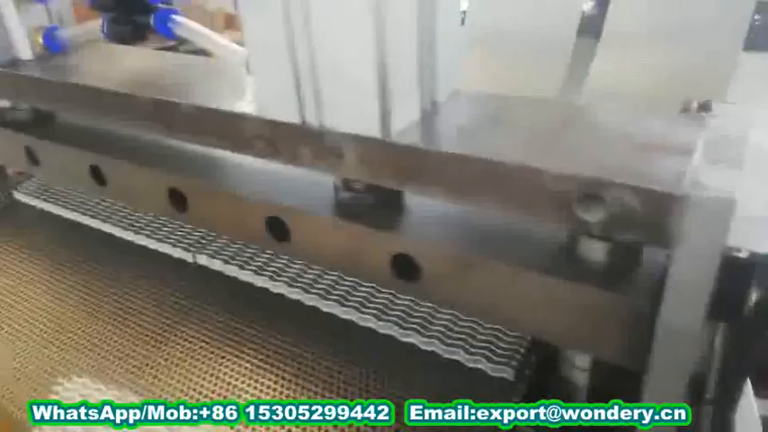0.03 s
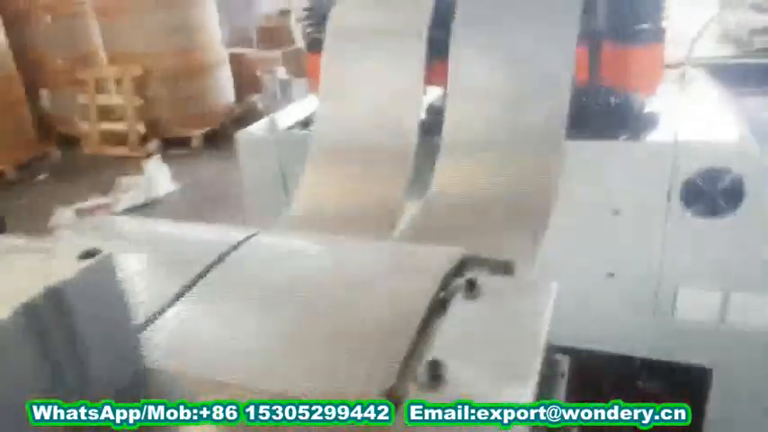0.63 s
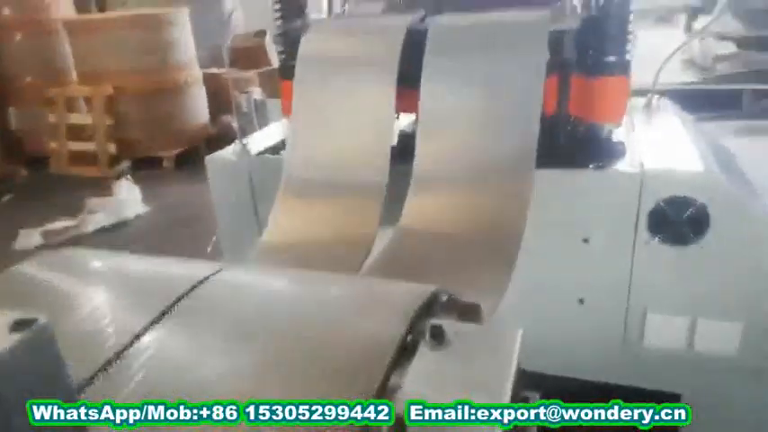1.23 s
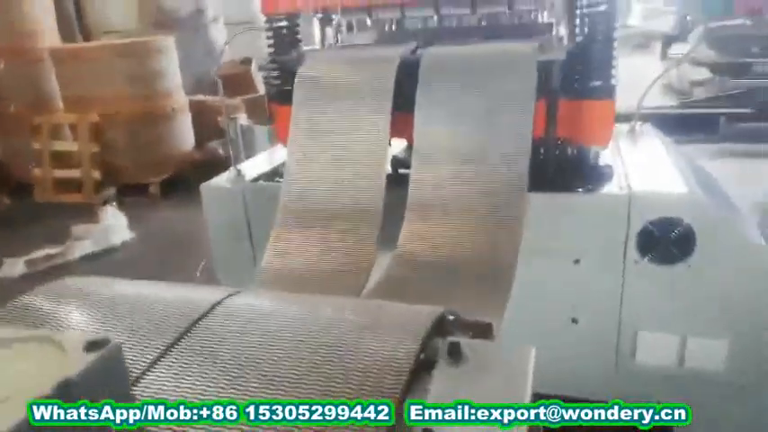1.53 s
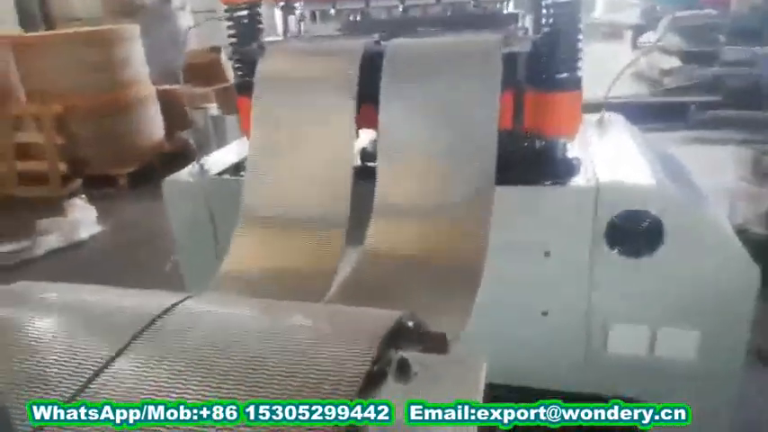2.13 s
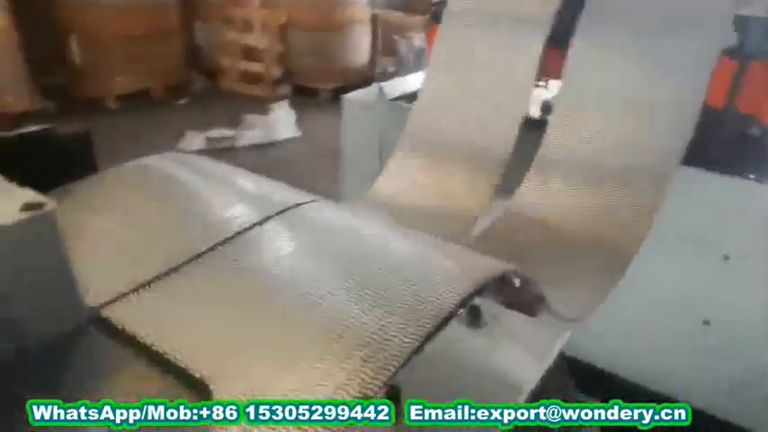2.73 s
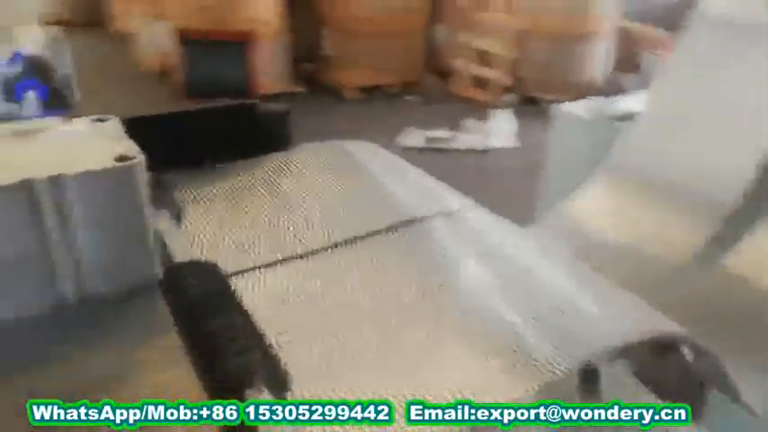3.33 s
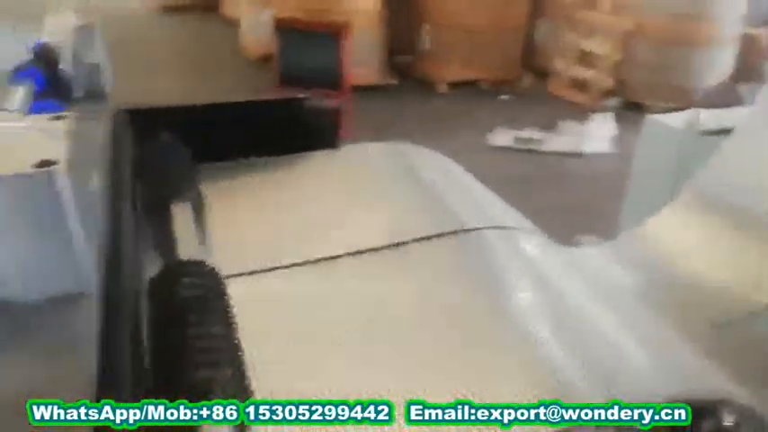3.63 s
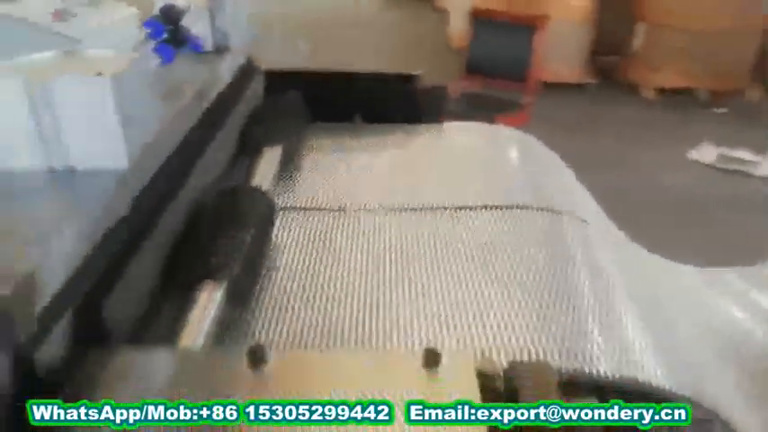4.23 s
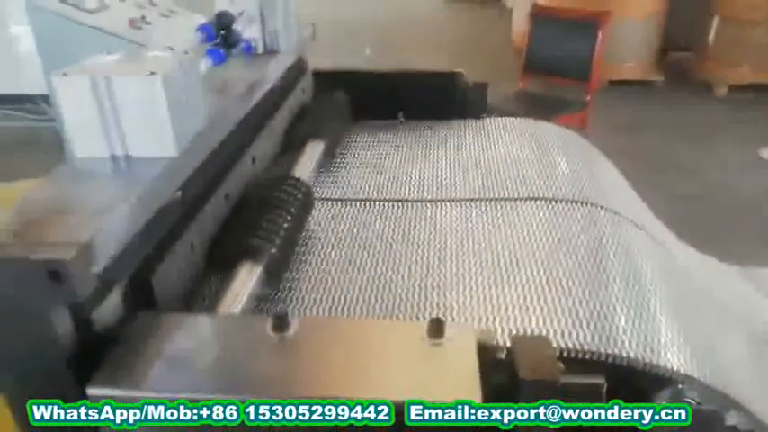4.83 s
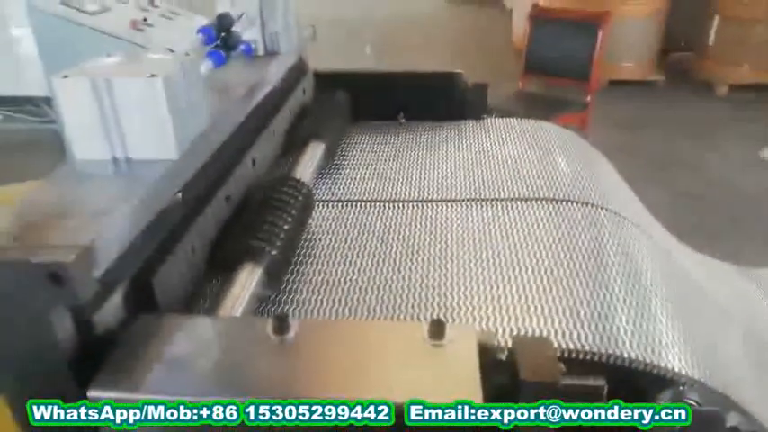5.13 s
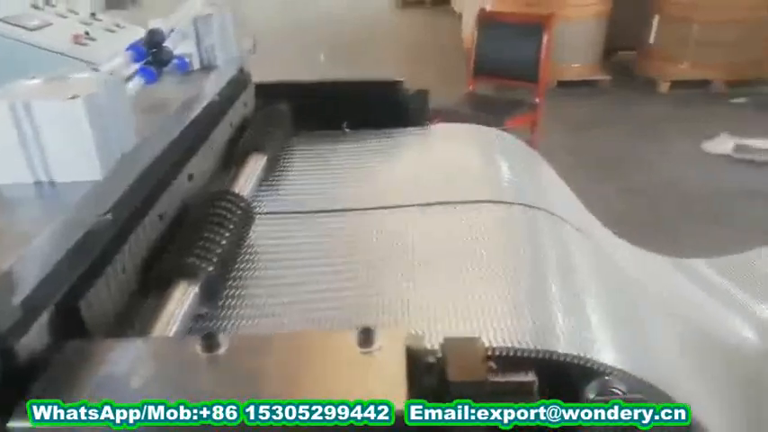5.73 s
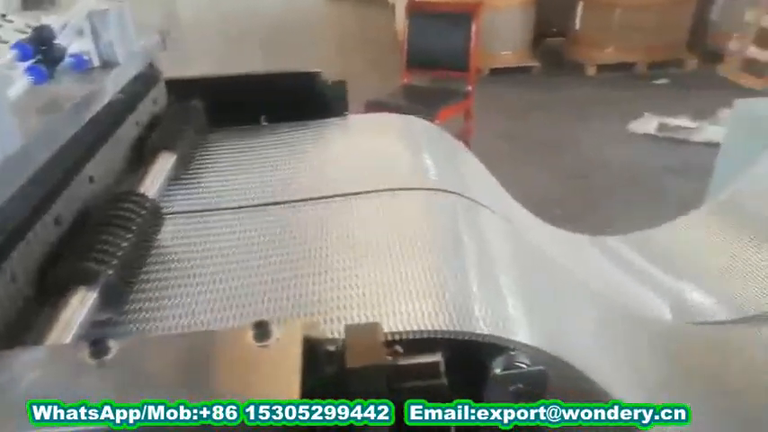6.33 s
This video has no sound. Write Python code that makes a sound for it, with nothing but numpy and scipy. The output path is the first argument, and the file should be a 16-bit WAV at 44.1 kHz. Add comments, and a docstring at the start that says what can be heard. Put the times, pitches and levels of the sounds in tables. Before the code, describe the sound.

A stamping press runs in a large workshop, repeating a down-and-back pattern of heavy thuds, steel clanks, latch knocks and short air puffs. For the first two seconds, thin aluminum strip crinkles and snaps close by. Then the handheld phone microphone nears the feed: the press grows louder and brighter, the drive groans briefly on each cycle, and occasional sharp cracks and small pings cut through. Motors rumble underneath.

```python
"""A fin press stamps aluminium strip in a large workshop, heard on a phone carried from strip to feed.
Every turn plays the same groove, down and back: the latch knocks, blows thud in the heavy body and
clank in the steel tooling, an air valve puffs, and the feed drive groans as it slows.
At first the thin strip crinkles and snaps close by; loose parts ping, and later the die cracks sharply.
Motors rumble underneath and the hall smears it all."""
import sys
import numpy as np
from scipy import signal
from scipy.fft import rfft, irfft, next_fast_len
from scipy.io import wavfile
from scipy.ndimage import uniform_filter1d

SR = 44100
rng = np.random.default_rng(int(sys.argv[2]) if len(sys.argv) > 2 else 0)


def file_out(sig):
    """Save sig as 16-bit WAV at sys.argv[1]."""
    # one column per channel
    cols = np.atleast_2d(sig).T
    # limit, then scale
    lim = np.clip(cols, -1, 1)
    pcm = np.round(lim * 32767).astype(np.int16)
    wavfile.write(sys.argv[1], SR, pcm)


N = 281799
TIME = np.arange(N) / SR
RING = 6144  # samples in one hit
TURN_S, FIRST_TURN_S = .6125, .1023
TURNS = FIRST_TURN_S + TURN_S * np.arange(-1, N / SR / TURN_S)  # start of each turn
TOP_HZ = 11400
# fader rides: (level/dB beside the strip, level/dB beside the feed)
DOWN_DB, BACK_DB = (-2, -0.5), (-4, 1)
TREBLE_DB, DRIVE_DB, WORKSHOP_DB = (-4.5, 2), (-13.5, 3.5), (-6.5, 1)

# how near the phone is to the feed: (t/s, nearness 0-1)
NEARNESS = [(0, 0.88), (.5, 0.6), (1.15, 0.2), (1.75, 0.16), (2.399, 0.91), (3.3, 1), (6.39, 0.91)]
# tone curves of the sources: (f/Hz, level/dB)
WORKSHOP_EQ = [(15, -61), (25, -14.5), (85, 0.5), (151, 4.5), (410, 1), (587, -9), (1030, -6.5),
               (2010, -10.5), (2340, -13.5), (3110, -16), (4020, -17), (4810, -15.5), (6540, -20),
               (10100, -19.5), (11500, -65), (15000, -68), (22000, -120)]
STEEL_EQ = [(200, -35), (500, 3), (800, 3.5), (1300, 2.5), (1700, 2.5), (2400, -4.5), (3100, -3.5),
            (4000, -8), (8000, -48)]
CLICK_EQ = [(800, -12), (2000, 14.5), (3300, 5), (4500, 7), (6500, 3), (8500, 0.5), (10300, 9),
            (11500, -28)]
AIR_EQ = [(800, -51), (2500, 4.5), (4500, 2), (7000, 3.5), (9000, 6), (10300, 7.5), (11500, -18.5)]
STRIP_EQ = [(590, -31), (1000, -6), (1310, 4), (2000, -4), (2560, 1), (3420, -1.5), (3910, 0), (4700, -1),
            (6200, -3.5), (7100, -3.5), (8200, -3), (9400, -3.5), (10300, 0.5), (10900, 1), (11800, -22.5)]
# resonances of the parts: (f/Hz, width/Hz, level/dB)
LATCH_MODES = [(903, 150, 4), (1006, 95, 4.5), (1186, 89, 5.5), (1330, 110, -1), (1527, 70, -1.5),
               (1950, 260, 2)]
LATCH_PING_MODES = [(1950, 170, 8), (2700, 100, 11), (2980, 63, 11), (3140, 84, 7)]
FRAME_MODES = [(122.8, 12, -8), (178, 36, -2.5), (217, 27, 0), (273, 63, 1), (318, 27, 2), (412, 55, 0),
               (518, 46, 3)]
TOOLING_MODES = [(764, 31, 5), (910, 74, -1.5), (1119, 59, 5.5), (1310, 57, 3), (1468, 30, 3),
                 (1960, 90, -18), (2500, 35, 2.5), (3430, 30, 11.5), (4440, 45, 2.5)]
FEED_TABLE_MODES = [(159, 15, -4), (224, 21, 0), (270, 23, 2.5), (360, 40, 0), (409.6, 24, 7),
                    (518, 62, 0.5)]
HOUSING_MODES = [(119.3, 23, 4.5), (158, 28, -1), (413, 41, -2.5)]
STRIP_MODES = [(6190, 140, 10), (8250, 130, 8.5), (8540, 120, 4), (10080, 58, -4), (10360, 110, 1)]
DIE_MODES = [(3420, 90, 10), (4400, 100, -1), (5470, 350, 3), (6800, 270, 0.5), (8250, 350, 1),
             (10260, 430, 4)]
# latch landings, every half turn: (t/s, knock level/dB, knock f/Hz, ping level/dB, tick level/dB)
LATCH_HITS = [(0.1032, -16, 1250, -52, -31), (0.4076, -11, 1210, -26, -20.5), (.7165, -14, 1260, -44, -30),
              (1.0202, -13.5, 1130, -30, -28), (1.33, -23.5, 1250, -49, -33),
              (1.6342, -15.5, 1250, -42, -36), (1.9335, -19.5, 1100, -32, -30),
              (2.246, -14, 1100, -45, -21.5), (2.553, -14, 1300, -40, -25), (2.859, -14.5, 1150, -32, -20),
              (3.167, -16, 1350, -30, -20), (3.4713, -19, 1040, -19, -24.5), (3.7785, -16, 1250, -29, -24),
              (4.0845, -16.5, 1010, -23, -21.5), (4.3906, -16, 1250, -28, -23),
              (4.697, -14.5, 1050, -19, -21), (5.0035, -18, 1290, -40, -22),
              (5.3097, -13.5, 1000, -20, -25), (5.616, -18.5, 1280, -36, -23),
              (5.922, -12.5, 1000, -21, -21.5), (6.2286, -19, 1320, -26, -24)]
# blows of the working and the return stroke:
# (t/s into the turn, thud level/dB, clank level/dB, clank f/Hz, click level/dB, click f/Hz, click t60/s)
DOWN_BLOWS = [(.063, -10, -12.5, 910, -21, 6700, 0.03), (.078, -14.5, -13.5, 1110, -23, 3000, 0.035),
              (.093, -10, -13, 1000, -23.5, 3230, 0.021), (.108, -5.5, -14, 720, -20, 7000, 0.032),
              (.116, -9, -14, 1090, -22.5, 6000, 0.028), (.139, -16, -20.5, 1030, -25.5, 3500, 0.11),
              (.161, -20, -15, 1080, -24, 3500, 0.04), (.168, -13.5, -15.5, 1120, -22, 3000, 0.04)]
BACK_BLOWS = [(.378, -19, -26.5, 700, -28.5, 9000, 0.062), (.394, -17.5, -21.5, 800, -26, 2500, 0.036),
              (.405, -7.5, -16, 650, -34, 2700, 0.019), (.419, -11, -18.5, 700, -40, 2980, 0.033),
              (.441, -13.5, -22, 704, -43, 3000, 0.034), (.462, -18, -17, 900, -22.5, 7560, 0.02),
              (.469, -18, -14, 860, -23, 2200, 0.02)]
# how hard each turn strikes, in order: (working stroke level/dB, return stroke level/dB)
ACCENTS = [(0, 5), (-2, -8.5), (0, -0.5), (-1, 2.5), (-1, 0.5), (-1, 1.5), (0.5, 1), (-0.5, 2), (0.5, 2),
           (-0.5, 1), (0.5, 2), (-1, 6)]
# air valve puffs: (t/s into the turn, attack/s, length/s, level/dB, change over the puff/dB)
PUFFS = [(0.069, 0.0052, 0.12, -27.5, -4.5), (0.373, 0.0098, 0.122, -33.5, 3.5)]
# feed drive groans: (t/s into the turn, length/s, starting f/Hz, fall/(octaves/s), level/dB)
GROANS = [(.385, 0.087, 440.1, 1.0, -18.5), (.49, 0.164, 151.8, 2.58, -33.5)]
# flexes of the strip: (t/s when fully bent, rise/s, hold/s, level/dB, decay/(dB/s))
FLEXES = [(0.496, 0.041, 0.01, -16, 140), (0.616, 0.024, 0.026, -26, 217), (0.758, 0.026, 0.034, -27, 108),
          (1.043, 0.081, 0.051, -19, 228), (1.163, 0.016, 0.014, -16.5, 150),
          (1.44, 0.73, 0.042, -30, 99.5), (1.521, 0.1, 0.026, -17, 180), (1.772, 0.027, 0.036, -18.5, 242),
          (1.913, 0.016, 0.034, -18.5, 164)]
# one-shots from the strip, loose steel parts and the die: (t/s, level/dB, f/Hz)
STRIP_SNAPS = [(0.4978, 0.5, 6100), (0.6096, 0, 8000), (0.665, -9.5, 5000), (0.7593, -4, 8040),
               (.794, -8, 3500), (1.022, -11, 7000), (1.035, -6, 9000), (1.054, -3, 8160),
               (1.073, -4, 9000), (1.09, -3, 9000), (1.161, 2, 7500), (1.179, 1, 7500), (1.5271, -2, 9000),
               (1.556, -12, 9000), (1.582, -6, 7530), (1.764, -2, 7000), (1.784, -1, 8000),
               (1.802, -4, 7450), (1.909, -7, 6940), (1.947, -2, 7000), (1.962, -4, 7950)]
LOOSE_PINGS = [(.797, -18, 3480), (1.41, -22, 3450), (2.655, -22, 4400), (3.283, -22, 3400),
               (3.312, -22, 4300), (3.872, -18, 3450)]
DIE_CRACKS = [(2.618, -18, 7530), (2.655, -13, 4400), (2.745, -12, 6500), (3.23, -16, 6950),
              (3.358, -11.5, 6400), (3.842, -14, 8470), (3.873, -13, 7500), (4.459, -16, 8040),
              (5.067, -13.5, 8340), (6.291, -11, 7420)]
# stereo width at the two microphone ports: (f/Hz, side minus mid level/dB)
WIDTH = [(60, -19), (130, -24.5), (190, -15), (350, -5.5), (620, 2.5), (1120, -5), (2020, 0), (11000, 0)]
# where press and strip sit in the image: (f/Hz, left minus right level/dB)
PRESS_PAN = [(350, 0.5), (620, -5), (1120, -2), (2020, 1.5), (3620, -0.5), (6500, -5), (11000, -2)]
STRIP_PAN = [(620, 17), (1120, 0.5), (2020, -8), (3620, -6), (6500, -3.5), (11700, 5.5)]


def undb(db):
    """Decibels to gain."""
    return np.exp(np.asarray(db) * (np.log(10) / 20))


def unit(x):
    """Scale every row to rms 1."""
    return x / np.sqrt(np.mean(x ** 2, axis=-1, keepdims=True))


def freqs():
    """Frequency grid of the filter curves."""
    return np.maximum(np.fft.rfftfreq(RING, 1 / SR), 1)


def colour(points):
    """EQ curve through (f/Hz, level/dB) points."""
    hz, db = np.transpose(points)
    return undb(np.interp(np.log(freqs()), np.log(hz), db))


def resonances(modes):
    """EQ curve of (f/Hz, width/Hz, level/dB) modes."""
    f = freqs()
    powers = (undb(db) ** 2 / (1 + ((f * f - hz * hz) / (f * width)) ** 2) for hz, width, db in modes)
    return np.sqrt(sum(powers))


def band(hz, relative_width):
    """One broad peak that focuses a hit."""
    return resonances([(hz, relative_width * hz, 0)])


def plate(depth_db, spacing_hz):
    """The crowded weak modes of a metal plate, as random peaks and dips."""
    heights = np.interp(freqs() / spacing_hz, np.arange(RING), rng.standard_normal(RING))
    return undb(depth_db * np.clip(heights, -2, 1))


def shape(x, gain):
    """Apply an EQ curve at minimum phase, so nothing rings ahead of the attack."""
    cepstrum = irfft(np.log(gain + 1e-9))[:RING // 2]
    cepstrum[1:] *= 2
    response = irfft(np.exp(rfft(cepstrum, RING)))[:RING // 2]
    size = next_fast_len(x.shape[-1] + RING // 2, True)
    return irfft(rfft(x, size) * rfft(response, size), size)[..., :x.shape[-1]]


def wander(rate_hz):
    """Random modulator: sample and hold, slewed twice."""
    hold = int(SR / rate_hz)
    steps = np.repeat(rng.standard_normal(N // hold + 1), hold)[:N]
    return unit(uniform_filter1d(uniform_filter1d(steps, hold), hold))


def spikes(per_s, weakest, decay_s):
    """Envelope of random triggers, each dying away."""
    triggers = (rng.random(N) < per_s / SR) * rng.uniform(weakest, 1, N)
    return signal.lfilter([1], [1, -np.exp(-1 / (decay_s * SR))], triggers)


def fading(t60, rise_s):
    """Attack and decay of a struck part."""
    t = np.arange(RING) / SR
    return (1 - np.exp(-t / rise_s)) * undb(-60 * t / t60)


def struck(gain, t60, rise_s):
    """One contact: a noise burst rings through a part's resonances."""
    envelope = fading(t60, rise_s)
    burst = envelope * rng.standard_normal((2, RING))
    return unit(shape(burst, gain)) * np.sqrt(np.mean(envelope ** 2))


def add(out, s, sound):
    """Mix a sound in at s seconds."""
    start = int(s * SR)
    first, end = max(start, 0), min(start + sound.shape[-1], N)
    if end > first:
        out[:, first:end] += sound[:, first - start:end - start]


def near(levels_db):
    """Fader ride for one layer as the phone moves between strip and feed."""
    s, nearness = np.transpose(NEARNESS)
    strip_db, feed_db = levels_db
    return undb(strip_db + (feed_db - strip_db) * np.interp(TIME, s, nearness))


def workshop(bed_db=-30.5, rattle_db=-41):
    """The bed: motors rumble, the workshop hisses, and loose parts rattle faintly."""
    noise = unit(shape(rng.standard_normal((2, N)), colour(WORKSHOP_EQ)))
    bed = noise * undb(bed_db + 1.75 * wander(9.8))
    taps = spikes(per_s=35, weakest=0.13, decay_s=0.016) * rng.standard_normal((2, N))
    rattle = unit(shape(taps, colour(STEEL_EQ) * np.hypot(1, resonances(TOOLING_MODES))))
    return (bed + rattle * undb(rattle_db)) * near(WORKSHOP_DB)


def latch():
    """The steel feed latch lands with a knock, a bright tick and more or less of a ping."""
    out = np.zeros((2, N))
    body, ping = resonances(LATCH_MODES) * colour(STEEL_EQ), resonances(LATCH_PING_MODES)
    for s, knock_db, hz, ping_db, tick_db in LATCH_HITS:
        add(out, s, undb(knock_db) * struck(body * band(hz, 0.64), t60=0.064, rise_s=.0011))
        add(out, s, undb(ping_db) * struck(ping, t60=0.086, rise_s=0.001))
        add(out, s, undb(tick_db) * struck(colour(AIR_EQ), t60=0.053, rise_s=0.0024))
    return out


def add_blow(out, s, db, gain, envelope, fresh, direct=0, jitter_s=.001, uneven_db=.9):
    """One contact on every turn: a direct push, then scatter, part repeating and part fresh."""
    noise = rng.standard_normal((len(TURNS) + 1, 2, RING))
    push = unit((noise[0] + fresh * noise[1:]) * envelope)
    push[:, 0, 0] += direct * np.sqrt(RING)  # an impulse in the mid channel
    rings = unit(shape(push, gain)) * np.sqrt(np.mean(envelope ** 2))
    for start, ring in zip(TURNS, rings):
        onset = start + s + jitter_s * rng.standard_normal()
        add(out, onset, undb(db + uneven_db * rng.standard_normal()) * ring)


def stroke(blows, body_modes, presence):
    """Each blow thuds in a heavy body, clanks in the tooling and clicks at the contact."""
    thud, clank, click = np.zeros((3, 2, N))
    body = resonances(body_modes) * resonances([(335, 340, 0)])
    tooling = np.hypot(1, resonances(TOOLING_MODES))
    for s, thud_db, clank_db, clank_hz, click_db, click_hz, t60 in blows:
        steel = tooling * plate(depth_db=7.5, spacing_hz=59.78) * colour(STEEL_EQ) * band(clank_hz, 0.53)
        edge = tooling * plate(depth_db=9, spacing_hz=120) * colour(CLICK_EQ) * band(click_hz, 0.73)
        add_blow(thud, s, thud_db, body, fading(1.414 * t60, rise_s=0.0018), fresh=0.63, direct=0.65)
        add_blow(clank, s, clank_db, steel, fading(1.47 * t60, rise_s=0.0013), fresh=0.91, direct=0.43)
        add_blow(click, s, click_db, edge, fading(t60, rise_s=0.0008), fresh=2)
    boom = hall(thud, wet_db=-12.5, t60=0.43)
    # the clanks carry far, the thuds are loud only nearby
    return boom * presence + clank * presence ** .2 + click * near(TREBLE_DB)


def air_valve(closing_s=0.012, flutter_db=2.2):
    """A valve puffs twice a turn: the first jet sags as the pressure drops, the second swells."""
    turn_time, flow = (TIME - FIRST_TURN_S) % TURN_S, 0
    for s, opening_s, length, db, change_db in PUFFS:
        age = turn_time - s
        gate = np.clip(age / opening_s, 0, 1) * np.clip((length - age) / closing_s, 0, 1)
        flow = flow + gate * undb(db + change_db * np.clip(age / length, 0, 1))
    jet = unit(shape(rng.standard_normal((2, N)), colour(AIR_EQ) * plate(depth_db=2.5, spacing_hz=110)))
    return flow * undb(flutter_db * wander(110)) * jet * near(TREBLE_DB)


def rebounds(first_s=.194, gap_s=.040, fade_db=1.5, clank_hz=1580, click_hz=5000, t60=0.04):
    """Three more blows as the tooling bounces after the working stroke, evenly and ever weaker."""
    blows = []
    for k in range(3):
        thud_db, clank_db, click_db = np.array([-28, -23, -25.5]) - k * fade_db
        blows.append((first_s + k * gap_s, thud_db, clank_db, clank_hz, click_db, click_hz, t60))
    return blows


def feed_drive(speed_jitter=0.0897, turn_spread=.02, overtone_db=-12, rough_db=3.5):
    """The slowing drive groans in rough falling tones that swell as they cross its housing's modes."""
    out = np.zeros((2, N))
    unsteady = 1 + speed_jitter * wander(110)
    for s, length, hz, octaves_per_s, db in GROANS:
        t = np.arange(0, length, 1 / SR)
        swell = undb(db) * signal.windows.tukey(len(t), 0.27)
        for start, speed in zip(TURNS, 1 + turn_spread * rng.standard_normal(len(TURNS))):
            pitch = hz * 2 ** (-octaves_per_s * t) * speed * np.interp(start + s + t, TIME, unsteady)
            angle = 2 * np.pi * np.cumsum(pitch) / SR
            tone = np.exp(1j * angle) + undb(overtone_db) * np.exp(2j * angle)
            add(out, start + s, swell * np.array([tone.imag, tone.real]))  # mid and side in quadrature
    rough = out * undb(rough_db * wander(110))
    return shape(rough, np.hypot(0.4, resonances(HOUSING_MODES))) * near(DRIVE_DB)


def flexing(rise_db=13.5, quiver_db=-40):
    """Each flex builds up, holds and dies away; the strip never rests entirely."""
    power = undb(quiver_db) ** 2
    for s, rise_s, hold_s, db, fall_db_per_s in FLEXES:
        attack_db = rise_db * np.maximum(s - TIME, 0) / rise_s
        decay_db = fall_db_per_s * np.maximum(TIME - s - hold_s, 0)
        power = power + undb(db - attack_db - decay_db) ** 2
    return np.sqrt(power)


def bending(x, shapes_per_s=30, count=7):
    """The sheet morphs from one bent shape to another, each with its own resonances."""
    shares = np.exp(2 * np.array([wander(shapes_per_s) for _ in range(count)]))
    # a crossfade halfway between equal power and equal gain
    shares /= np.sqrt(np.linalg.norm(shares, axis=0) * np.sum(shares, axis=0))
    return sum(share * shape(x, unit(plate(depth_db=9.5, spacing_hz=110))) for share in shares)


def strip(buckles_per_s=3500, snap_trim_db=-11):
    """Thin aluminium flexes in crinkles, each a swarm of tiny buckles, and now and then snaps through."""
    crinkles = unit(np.sqrt(.1 + spikes(per_s=150, weakest=0.07, decay_s=0.00055)))
    buckles = (rng.random(N) < buckles_per_s / SR) * undb(np.minimum(rng.exponential(size=N), 5))
    grit = unit(buckles * rng.standard_normal((2, N)) + 0.52 * rng.standard_normal((2, N)))
    push = grit * flexing() * crinkles * undb(-2)
    for s, db, hz in STRIP_SNAPS:
        add(push, s, undb(db + snap_trim_db) * struck(band(hz, 1), t60=0.023, rise_s=0.00055))
    sheet = colour(STRIP_EQ) * np.hypot(1, resonances(STRIP_MODES))
    high_cut = 1 / np.hypot(1, (freqs() / TOP_HZ) ** 20)
    return bending(shape(push, unit(sheet * high_cut)))


def loose_pings(width_hz=70):
    """Each loose steel part rings briefly at its own pitch."""
    out = np.zeros((2, N))
    for s, db, hz in LOOSE_PINGS:
        add(out, s, undb(db) * struck(resonances([(hz, width_hz, 0)]), t60=.07, rise_s=.0008))
    return out


def die_cracks():
    """Short, hard cracks of the die that ring briefly in its high modes."""
    out = np.zeros((2, N))
    for s, db, hz in DIE_CRACKS:
        add(out, s, undb(db) * struck(resonances(DIE_MODES) * band(hz, 0.54), t60=0.011, rise_s=0.00036))
    return out


def hall(x, wet_db, t60=0.94, treble_t60=0.37, split_hz=2500, build_s=.02):
    """Diffuse reverb of the workshop; the treble dies first."""
    t = np.arange(SR) / SR
    noise = rng.standard_normal((2, SR))
    low = signal.sosfilt(signal.butter(2, split_hz, fs=SR, output="sos"), noise)
    high = signal.sosfilt(signal.butter(2, split_hz, "high", fs=SR, output="sos"), noise)
    tail = (low * 1e-3 ** (t / t60) + high * 1e-3 ** (t / treble_t60)) * np.clip(t / build_s, 0, 1)
    return x + undb(wet_db) * signal.fftconvolve(x, unit(tail) / np.sqrt(SR), axes=1)[:, :N]


def ports(x, pan):
    """Mid and side to left and right: the bass reaches both microphone ports alike."""
    mid, side = x[0], shape(x[1], colour(WIDTH))
    lean = np.sqrt(colour(pan)) ** np.clip(freqs() / 150 - 1, 0, 1)  # centred below 150 Hz
    return np.array([shape(mid + side, lean), shape(mid - side, 1 / lean)])


def scene(dip_s=1.232, dip_half_width_s=0.084, dip_db=-7):
    """The mix: press and workshop, whose level dips briefly, and the nearly dry strip up close."""
    down, back = undb(ACCENTS)[np.searchsorted(TURNS, TIME) - 1].T  # held through each turn
    press = stroke(DOWN_BLOWS + rebounds(), FRAME_MODES, down * near(DOWN_DB))
    press += stroke(BACK_BLOWS, FEED_TABLE_MODES, back * near(BACK_DB))
    press += latch() + air_valve() + feed_drive() + die_cracks() + loose_pings()
    dip = undb(dip_db * np.exp(-((TIME - dip_s) / dip_half_width_s) ** 4))
    machine = dip * (undb(-2.5) * hall(press, wet_db=-13) + workshop())
    return ports(machine, PRESS_PAN) + ports(hall(strip(), wet_db=-30), STRIP_PAN)


def record(dry):
    """The phone rounds the sharpest peaks and cuts the top."""
    soft_clipped = dry / (1 + (dry / .72) ** 6) ** (1 / 6)
    return signal.sosfilt(signal.ellip(8, .2, 80, TOP_HZ, fs=SR, output="sos"), soft_clipped)


dry = scene()
out = record(dry)
file_out(out)
```